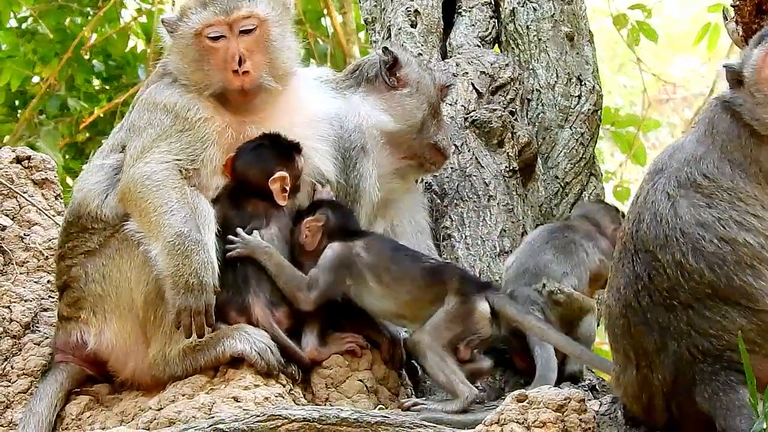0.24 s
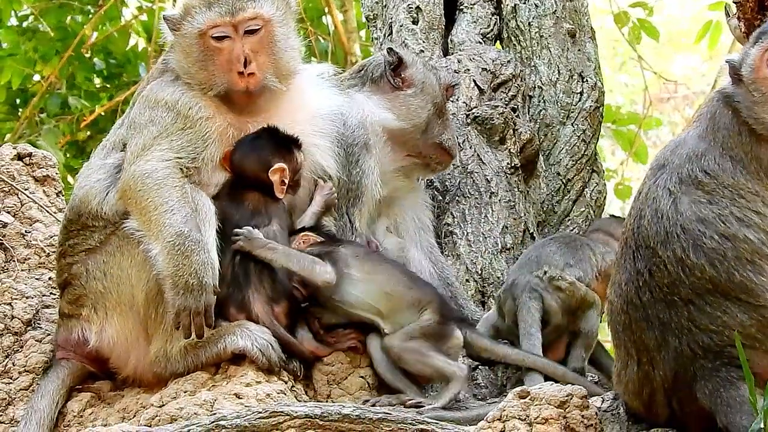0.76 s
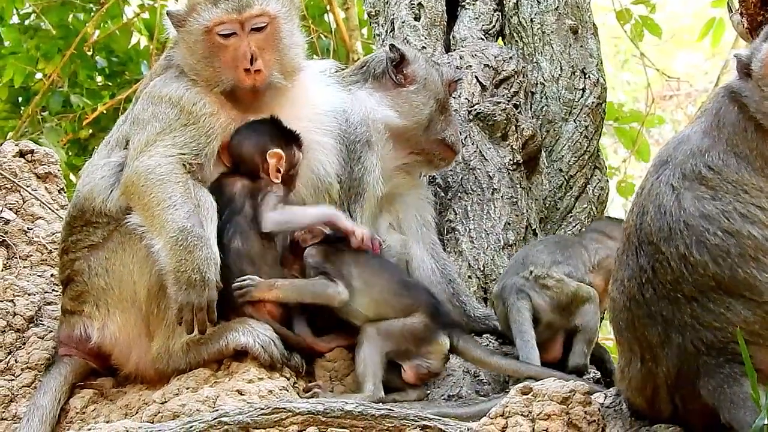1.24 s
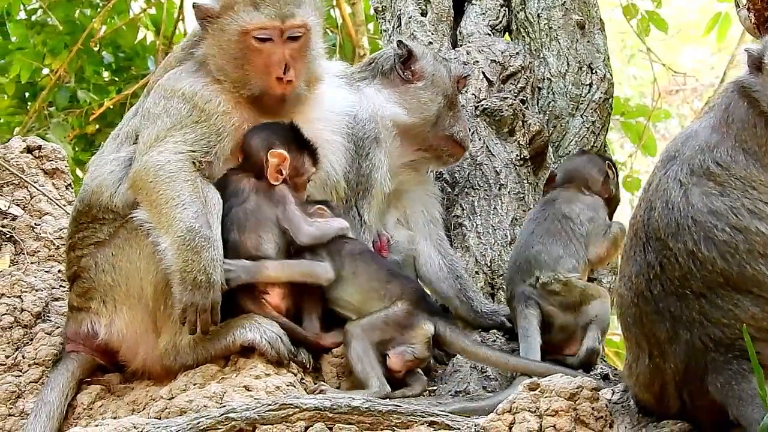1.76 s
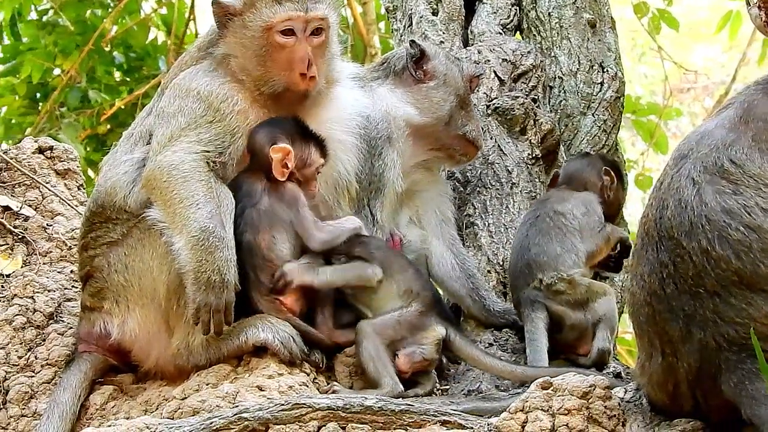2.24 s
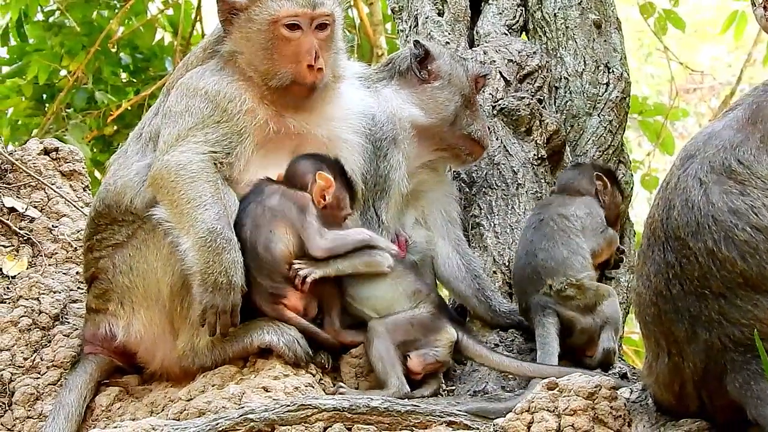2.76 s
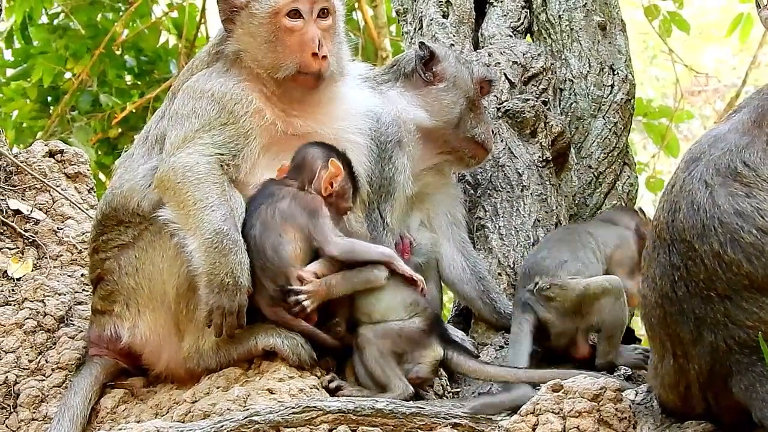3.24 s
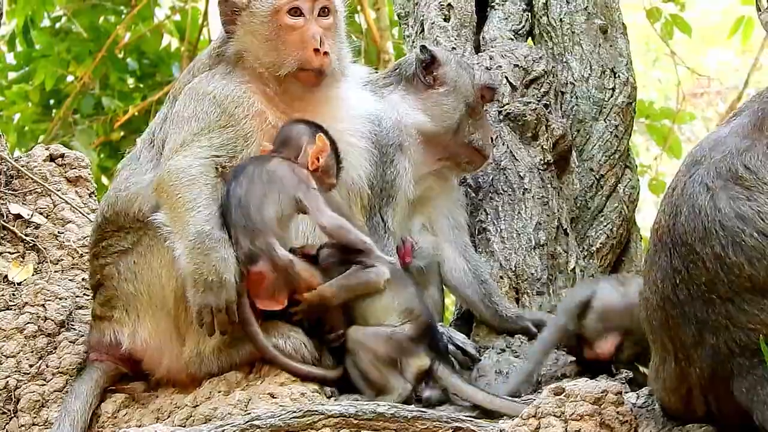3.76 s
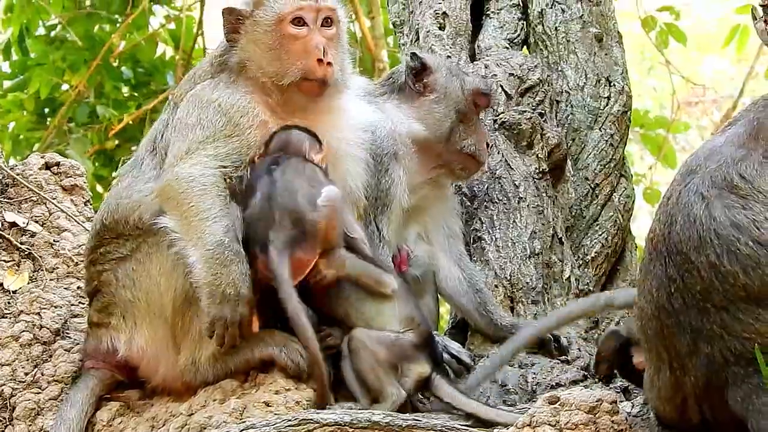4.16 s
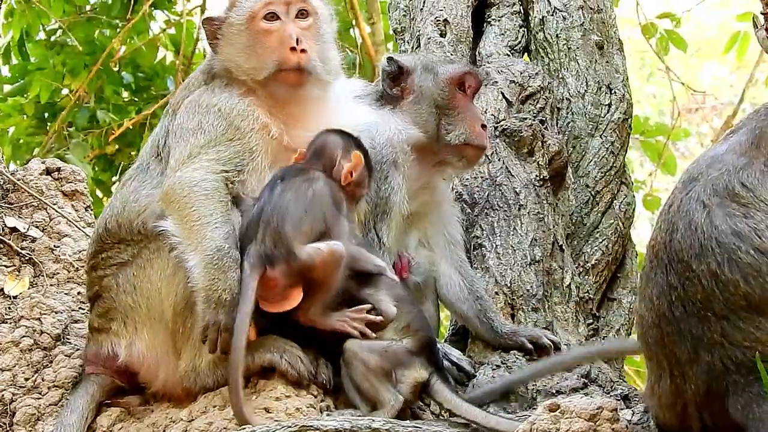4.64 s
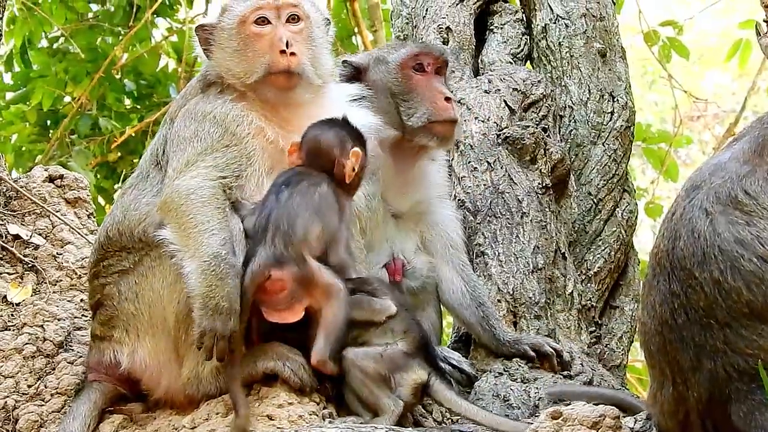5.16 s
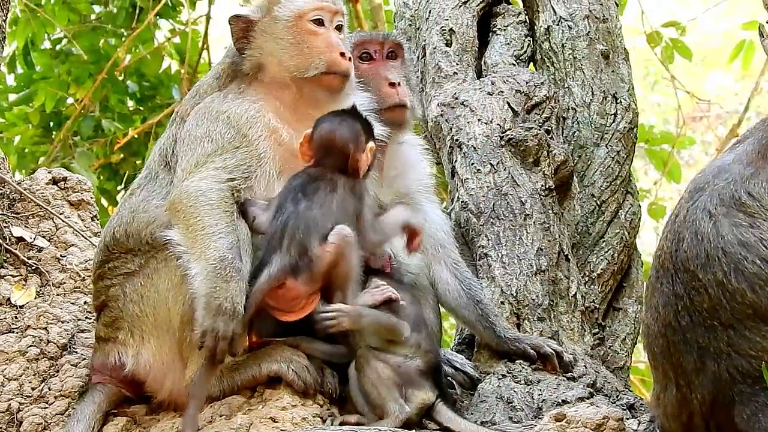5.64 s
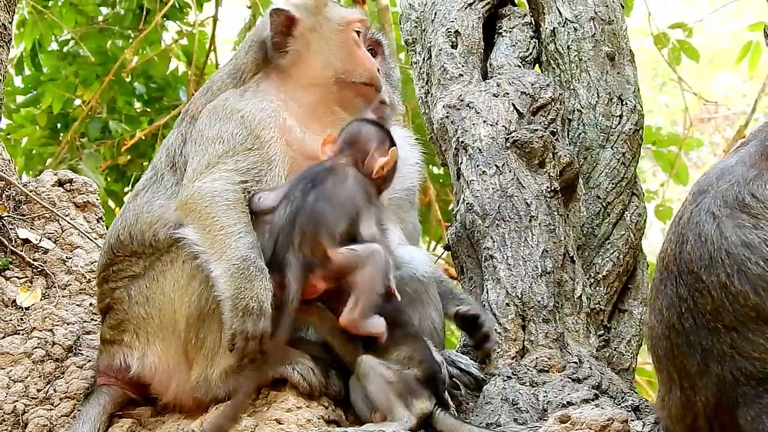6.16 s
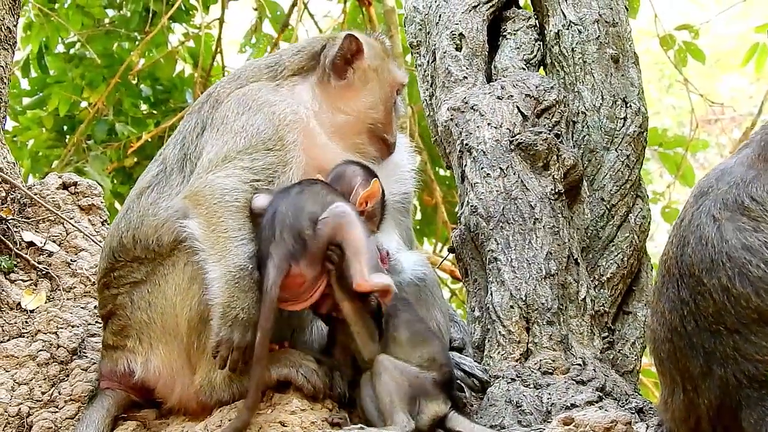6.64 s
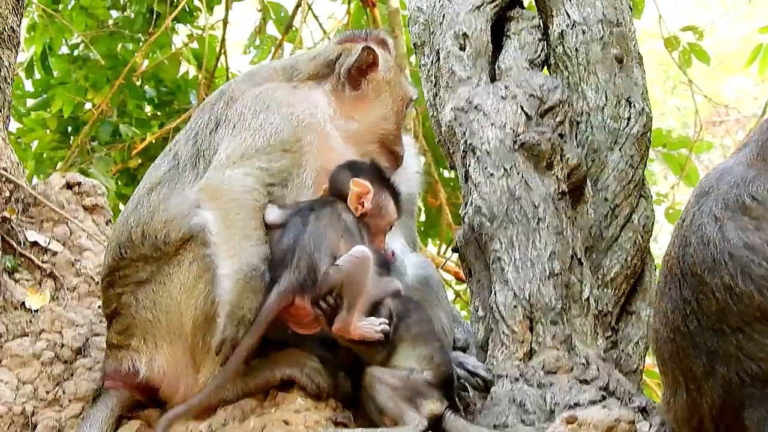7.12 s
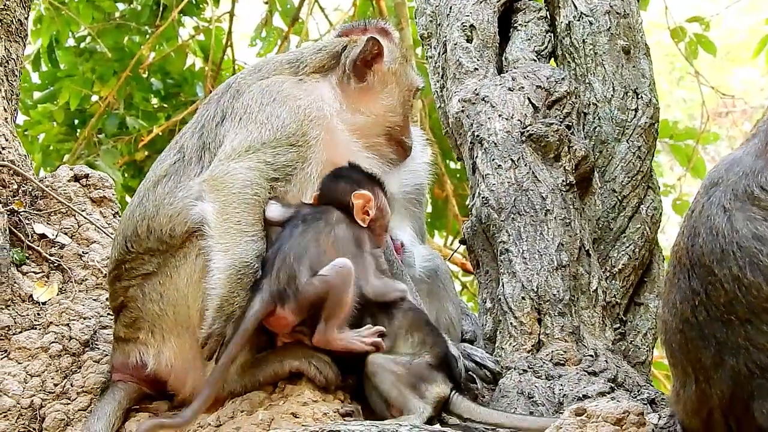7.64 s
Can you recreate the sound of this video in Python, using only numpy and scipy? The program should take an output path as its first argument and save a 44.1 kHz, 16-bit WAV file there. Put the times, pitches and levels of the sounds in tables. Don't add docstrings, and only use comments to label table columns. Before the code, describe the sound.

Cicadas chirr shrilly and steadily outdoors while leaves scuff, an infant monkey squeals hoarsely, a small motorbike putters past, and a thin whistle ends it.

```python
import sys
import numpy as np
from scipy import signal
from scipy.fft import rfft, irfft
from scipy.io import wavfile
from scipy.ndimage import uniform_filter1d

SR = 44100
rng = np.random.default_rng(int(sys.argv[2]) if len(sys.argv) > 2 else 0)


def master_out(mix):
    frames = np.transpose(np.atleast_2d(mix))
    ceiling = np.clip(frames, -1, 1)
    pcm = np.round(ceiling * 32767).astype(np.int16)
    wavfile.write(sys.argv[1], SR, pcm)


def volts_from_db(level):
    exponent = np.asarray(level, float) / 20
    return 10 ** exponent


N = 347949

HOP = 128
FRAMES = dict(nperseg=4 * HOP, noverlap=3 * HOP)
HZ = np.fft.rfftfreq(4 * HOP, 1 / SR)
TIMES = np.arange(N // HOP + 5) * HOP / SR

# f/Hz, left-right correlation
LIKENESS = [(60, .99995), (250, .996), (500, .97), (1000, .8), (2030, .7), (4100, .35), (8300, .3)]
# f/Hz, left lead/rad
LEFT_LEAD = [(0, 0), (400, 0), (2000, -.25), (4800, -.6), (5400, -.6), (5800, .9), (6500, 1), (8400, 2.4)]
# t/s, level/dB, upper edge brightness/dB
CHORUS_CURVE = [(0.0, -50, -2), (0.26, -49.5, -2.5), (0.33, -52, -1.5), (0.44, -49, -2.5), (0.7, -50, -4.5),
                (1.12, -48, -2.5), (1.25, -50.5, 1.5), (2.22, -48.5, -4.5), (2.35, -51, 0),
                (3.25, -49, -1.5), (3.41, -51.5, -1.5), (3.56, -49.5, -2), (4.14, -51, 0.5),
                (4.19, -47, -4.5), (4.4, -50, -1), (5.9, -47.5, -3), (6.8, -50, -2.5), (7.89, -49.5, -3)]
# f/Hz, density/dB per Hz
DRUM_RING = [(4890, -48), (5720, -11), (6090, -3), (6370, 0.5), (7500, -2), (8000, -7), (8750, -17),
             (9400, -34.5), (9950, -45), (10600, -33), (11900, -42.5), (12900, -64), (14200, -40.5),
             (15600, -49)]
# click rate/Hz, level/dB
NEAR_SINGERS = [(75, -9), (107, 6), (137, -19), (199, 7), (262, -15.5), (353, -9.5), (476, 0.5)]
# middle t/s, length/s, swell/dB
DEEP_SWELLS = [
    (0.21, 0.68, 4.5),
    (1.854, 0.096, 13),
    (2.35, 0.6, 18.5),
    (3.654, .25, 1),
    (4.056, 0.3, 23),
    (4.5, .4, 24),
    (5.5, 0.18, 5),
    (7.145, 0.32, 16),
]
# f/Hz, density/dB per Hz
HUM = [(15, -66), (25, -56), (65, -4), (282, -8), (408, -7.5), (445, -11.5), (1190, -10.5), (1800, -16.5),
       (1960, -9), (2140, -10), (4600, -33.5), (5980, -62), (10100, -120)]
# multiple of firing rate, level/dB
EXHAUST_ORDERS = [(1, -25), (2, -6), (3, -33), (4, -5.5), (5, 2.5), (6, 5), (7, -2.5), (8, -21.5), (9, -28),
                  (10, -5), (11, -18), (12, -33), (13, -28), (14, -12)]
# f/Hz, density/dB per Hz
CASING_SPECTRUM = [(120, -34), (250, -17.5), (450, -1), (750, 1), (1400, 4), (2200, 3), (2900, -1),
                   (3900, -8.5), (5200, -14.5), (6400, -14), (8750, -24), (11000, -30.5), (13500, -38.5),
                   (15000, -70)]
# f/Hz, width/Hz, peak/dB
CASING_MODES = [(430, 30, 4), (600, 35, 4), (720, 35, 5), (1165, 35, 5), (1300, 40, 4), (1435, 30, 5),
                (1600, 50, 5), (1766, 30, 5), (2110, 40, 3), (2612, 30, 4), (2773, 35, 4), (2930, 40, 4),
                (3500, 60, 4)]
# t/s, exhaust level/dB, clatter level/dB, brightness/dB
TRUNK_COVER = [(1.3, -90, -86.5, 4), (2.7, -84, -79, 1.5), (4.4, -84.5, -73, 6), (4.75, -78, -66, 2.5),
               (5.08, -66.5, -60, 2), (5.5, -64, -66.5, 3.5), (5.75, -62.5, -59.5, 6),
               (5.93, -55.5, -46, 4.5), (6.12, -55.5, -48, 1.5), (6.23, -53.5, -48, 4),
               (6.4, -54.5, -57.5, 1.5), (6.56, -56.5, -65, 3.5), (6.6, -54.5, -58, 1),
               (6.66, -58.5, -62.5, -3.5), (6.8, -64.5, -60.5, -3), (6.98, -64.5, -66, -6),
               (7.15, -73.5, -70, -2), (7.89, -82, -81, 0.5)]
# from f/Hz, to f/Hz, offset/dB, share of brightness/1
CLATTER_BANDS = [
    (350, 763, -5.5, -0.94),
    (1000, 2700, -1, 0),
    (2300, 3100, -2, 0.37),
    (4100, 4400, -5, 1.53),
]
# t/s, level/dB, length/s, centre f/Hz
LEAF_SCUFFS = [(1.072, -75, 0.068, 4700), (1.146, -71.5, 0.081, 1470), (2.092, -63.5, 0.19, 5500),
               (2.3, -78, 0.65, 5360), (2.665, -71.5, 0.091, 1810), (2.992, -68.5, 0.085, 1510),
               (3.088, -68, 0.12, 2300), (3.155, -70, 0.053, 2300), (3.357, -75, 0.054, 2260),
               (3.663, -69.5, 0.054, 1840), (4.195, -68, 0.056, 3270), (4.3, -66.5, 0.061, 3440),
               (4.445, -67, 0.094, 3600), (7.168, -83, .05, 2540), (7.542, -67.5, 0.094, 2460),
               (7.69, -69.5, 0.37, 3180), (7.857, -63, 0.056, 1700)]
# start t/s, length/s, level/dB, f/Hz, blur/0-1
THIN_CALLS = [
    (1.09, .12, -79.5, 1245, .97),
    (1.19, .14, -80, 1260, .97),
    (7.12, .09, -73, 2230, .8),
    (7.435, .11, -72, 1945, .5),
    (7.525, .12, -69.5, 1975, .5),
    (7.71, .085, -70, 1985, .5),
    (7.77, .13, -69, 1990, .45),
    (7.7, .18, -81, 590, .5),
    (7.71, .17, -75, 3400, .98),
    (4.82, .45, -74, 715, .8),
]
# t/s, effort/dB, first band f/Hz, second band f/Hz, second band level/dB
SQUEAL_CURVE = [
    (5.8, -62, 1750, 3000, 0),
    (5.89, -49, 1580, 2850, 1),
    (5.98, -44, 1420, 2900, 0),
    (6.08, -43, 1400, 3250, -1),
    (6.13, -48, 1420, 3500, -4),
    (6.2, -41.5, 1560, 3500, -9),
    (6.33, -52, 2050, 4200, -1),
    (6.46, -53.5, 2230, 3700, 0),
    (6.55, -68, 2250, 3400, -3),
]
# start t/s, length/s, effort/dB, first band f/Hz
HOARSE_MUTTERS = [
    (4.501, .28, -65, 1300),
    (4.798, 0.48, -63, 1274),
    (5.055, 0.46, -63, 1285),
    (6.001, 0.32, -46.5, 1140),
    (6.57, 0.15, -59, 1010),
    (6.702, 0.27, -60.5, 1310),
    (6.699, 0.28, -61, 1900),
    (6.837, 0.24, -59.5, 964),
    (7.078, 0.22, -68, 1010),
]
# f/Hz, width/Hz, gain/dB
HOUSING_NOTCHES = [(505, 55, -4.5), (860, 110, -6), (3980, 110, -7)]

PASS_S, SPEED_M_S, DISTANCE_M = 6.3, 14, 16
FIRING_HZ, SOUND_M_S = 28.45, 343
PAN_DB, PAN_SWING_DB = 1.5, 5.5


def evened(x):
    return x / np.sqrt(np.mean(x ** 2) + 1e-20)


def drift(shape, size):
    return evened(uniform_filter1d(rng.standard_normal(shape), size=size))


def patches(noise, bins, frames):
    return evened(uniform_filter1d(uniform_filter1d(noise, size=bins, axis=0), size=frames, axis=1))


def read(points, hz):
    f, value = np.transpose(points)
    return np.interp(np.log(hz + 1), np.log(f + 1), value)


def columns(rows, t):
    s, *cols = np.transpose(rows)
    return [np.interp(t, s, c) for c in cols]


def peaks_db(modes, hz):
    return sum(db / (1 + (2 * (hz - f) / width) ** 2) for f, width, db in modes)


def band_db(shape_db, lo_hz, hi_hz):
    inside = (HZ >= lo_hz) & (HZ < hi_hz)
    return shape_db - 10 * np.log10(np.sum(volts_from_db(shape_db[inside]) ** 2))


def hiss(field_db, pan_db=0, patchy_db=1.5, like=1):
    a, b, c, d, noise = rng.standard_normal((len(TIMES), len(HZ), 5)).T
    same = np.clip(like * read(LIKENESS, HZ), -1, 1)[:, None]
    left, own = a + 1j * b, c + 1j * d
    pan_db = pan_db * np.clip((HZ / 1300) ** 2, 0, 1.9)[:, None]
    pan_db = pan_db * np.clip((7000 - HZ) / 3000, 0, 1)[:, None]
    lag = np.exp(-1j * read(LEFT_LEAD, HZ))[:, None]
    right = same * left * lag + np.sqrt(1 - same ** 2) * own
    z = np.array([left * volts_from_db(pan_db / 2), right * volts_from_db(-pan_db / 2)])
    z = z * volts_from_db(field_db + patchy_db * patches(noise, 6, 24))
    return signal.istft(z, **FRAMES)[1][:, :N] * 2 / np.sqrt(3)


def cicadas():
    clicks = np.zeros((2, N))
    for rate_hz, db in NEAR_SINGERS:
        turns = np.floor(np.cumsum(rate_hz * (1 + .12 * drift(N, 2000))) / SR)
        train = np.diff(turns, prepend=0) * volts_from_db(db + 3.6 * rng.standard_normal(N))
        burst = rng.standard_normal((2, 600)) * np.exp(-np.arange(600) / 110)
        clicks += signal.oaconvolve(train[None], burst, axes=1)[:, :N]
    crowd = .5 * evened(clicks) + 0.87 * rng.standard_normal((2, N))
    a, b = signal.stft(crowd, **FRAMES)[2]
    lag = np.exp(-1j * read(LEFT_LEAD, HZ))[:, None]
    z = np.array([a, 0.38 * a * lag + 0.97 * b])

    level_db, bright_db = columns(CHORUS_CURVE, TIMES)
    level_db = level_db + .45 * drift(len(TIMES), 20)
    deep_db = sum(db * np.exp(-(2 * (TIMES - s) / length) ** 4) for s, length, db in DEEP_SWELLS)
    tilt_db = np.outer(np.clip((HZ - 6800) / 1500, -1, 1), bright_db)
    tilt_db += np.outer(np.exp(-((HZ - 5040) / 560) ** 2), deep_db)
    turns_db = 1.47 * patches(rng.standard_normal(a.shape), 8, 30) * (HZ < 9200)[:, None]
    z *= volts_from_db(read(DRUM_RING, HZ)[:, None] + tilt_db[:, :z.shape[2]] + turns_db)
    ring = evened(signal.istft(z, **FRAMES)[1][:, :N])
    level = volts_from_db(np.interp(np.arange(N) / SR, TIMES, level_db) + 2.5)
    return level * ring * volts_from_db(np.array([[.35], [-.35]]))


def air():
    hz, frames = np.fft.rfftfreq(2048, 1 / SR), N // 512 + 5
    a, b, c, d, noise = rng.standard_normal((frames, len(hz), 5)).T
    same, left = read(LIKENESS, hz)[:, None], a + 1j * b
    right = same * left + np.sqrt(1 - same ** 2) * (c + 1j * d)
    swell_db = 2.8 * np.clip(hz / 900, .4, 1)[:, None] * patches(noise, 16, 7)
    z = np.array([left, right]) * volts_from_db(read(HUM, hz)[:, None] + swell_db)
    return volts_from_db(-76.5) * evened(signal.istft(z, nperseg=2048, noverlap=1536)[1][:, :N])


def bearing(t):
    along_m = SPEED_M_S * (t - PASS_S)
    return along_m / np.hypot(along_m, DISTANCE_M)


def side_db(t):
    x = bearing(t)
    return PAN_DB * x ** 2 + PAN_SWING_DB * x * (1 + x) ** 0.85 - 1.2


def motorbike():
    t = np.arange(N) / SR
    rate_hz = FIRING_HZ * (1 - SPEED_M_S / SOUND_M_S * bearing(t))
    turns = np.cumsum(rate_hz * (1 + 0.009 * drift(N, 2500))) / SR
    pipe = sum(volts_from_db(db) * np.cos(2 * np.pi * k * turns + 0.33 * k) for k, db in EXHAUST_ORDERS)
    exhaust_db, open_db, bright_db = columns(TRUNK_COVER, TIMES)
    exhaust = volts_from_db(np.interp(t, TIMES, exhaust_db) + 0.6) * evened(pipe)

    shape_db = read(CASING_SPECTRUM, HZ)
    shade_db = []
    for lo_hz, hi_hz, db, share in CLATTER_BANDS:
        to_band_db = band_db(shape_db, lo_hz, hi_hz)[0] - shape_db[0]
        shade_db.append(open_db + db + share * bright_db + to_band_db)
    place = np.interp(np.log(HZ + 1), np.log([700, 1400, 3000, 4500]), np.arange(4))
    blend = np.clip(1 - abs(place[:, None] - np.arange(4)), 0, 1)
    sheen_db = 0.22 * (open_db - open_db.max()) - 7.5 + 0.66 * bright_db
    lost_db = np.outer(np.clip((HZ - 6000) / 5000, 0, 1), sheen_db)
    clatter = hiss(shape_db[:, None] + blend @ shade_db + lost_db, side_db(TIMES), patchy_db=2.7, like=1.08)
    modes_db = peaks_db(CASING_MODES, np.fft.rfftfreq(N, 1 / SR)) - 1.0
    clatter = irfft(rfft(clatter) * volts_from_db(modes_db), N)

    rumble_db = band_db(-abs(np.log2((HZ + 9) / 200)) * 16, 0, 300)[:, None] + exhaust_db - 4.5
    rumble = hiss(rumble_db, patchy_db=.6, like=1.004)
    puffs = 1 + 0.093 * np.cos(2 * np.pi * turns - .6)
    fade_in = np.clip((t - .4) / 0.96, 0, 1)
    return fade_in * (exhaust + puffs * (clatter + rumble))


def leaves():
    power = np.full((len(HZ), len(TIMES)), 1e-14)
    for s, db, length, centre_hz in LEAF_SCUFFS:
        age = (TIMES - s) / length
        envelope = np.clip(age * 8, 0, 1) * np.exp(-np.clip(age, 0, 9) ** 2)
        shape_db = band_db(-7 * np.log2((HZ + 50) / centre_hz) ** 2, 0, SR)
        power += np.outer(volts_from_db(shape_db + db), envelope) ** 2
    crackle = evened(volts_from_db(0.69 * drift(N, 40)))
    return hiss(10 * np.log10(power), patchy_db=1.3) * crackle


def squeaks():
    out = np.zeros(N)
    for start, length, db, hz, blur in THIN_CALLS:
        at = np.arange(round(start * SR), min(round((start + length) * SR), N))
        re, im = (drift(SR, 300)[:len(at)] for _ in range(2))
        glide = np.linspace(1 - 0.0045, 1 + 0.0045, len(at))
        tone = np.exp(2j * np.pi * np.cumsum(hz * glide) / SR)
        tone *= np.sqrt(2 - 2 * min(blur, 1) ** 2) + blur * (re + 1j * im)
        out[at] += volts_from_db(db) * tone.real * signal.windows.tukey(len(at), .55)
    return out * volts_from_db(np.array([[.8], [-.8]]))


def mutter(start, length, effort_db, hz):
    return [(start + part * length, effort_db + db, hz, 1.7 * hz, -7)
            for part, db in ((0, -6), (0.41, 0), (1, -6))]


def resonate(x, hz, width_hz):
    turn, r = np.exp(2j * np.pi * np.cumsum(hz) / SR), np.exp(-np.pi * width_hz / SR)
    return evened((turn * signal.lfilter([1], [1, -2 * r, r * r], x / turn)).real)


def rasps():
    out = np.zeros((2, N))
    # curve, third band/Hz, first band width/Hz
    calls = [(SQUEAL_CURVE, 5150, 330)] + [(mutter(*row), 3400, 270) for row in HOARSE_MUTTERS]
    for rows, third_hz, width_hz in calls:
        at = np.arange(round(rows[0][0] * SR), round(rows[-1][0] * SR))
        effort_db, first_hz, second_hz, second_db = columns(rows, at / SR)
        uneven, *ragged = drift((4, SR), 300)[:, :len(at)]
        turns = np.cumsum(115 * (1 + 0.24 * uneven)) / SR
        pulses = .55 + np.exp(-(turns % 1) / 0.15)
        shared, left, right = pulses * rng.standard_normal((3, SR))[:, :len(at)]
        low, middle, high = volts_from_db(2.6 * np.array(ragged) - 1.36)
        for port, own in enumerate((left, right)):
            breath = shared + 0.39 * own
            throat = low * resonate(breath, first_hz, width_hz)
            throat += middle * volts_from_db(second_db) * resonate(breath, second_hz, 600)
            throat += high * volts_from_db(second_db - 4.5) * resonate(breath, third_hz + 0 * at, 920)
            out[port, at] += volts_from_db(effort_db) * throat * signal.windows.tukey(len(at), .06)
    out = signal.sosfilt(signal.butter(4, 8500, fs=SR, output='sos'), out)
    return out * volts_from_db(np.array([[.5], [-.5]]) * side_db(np.arange(N) / SR))


def scene():
    return cicadas() + air() + motorbike() + leaves() + squeaks() + rasps()


def low_pass(x):
    return signal.sosfilt(signal.butter(12, 15700, fs=SR, output="sos"), x)


def record(dry):
    hz = np.fft.rfftfreq(N, 1 / SR)
    colour = volts_from_db(peaks_db(HOUSING_NOTCHES, hz)) / (1 + (42 / (hz + 1)) ** 5)
    mix = irfft(rfft(dry) * colour, N)
    return low_pass(mix)


dry = scene()
out = record(dry)
master_out(out)
```